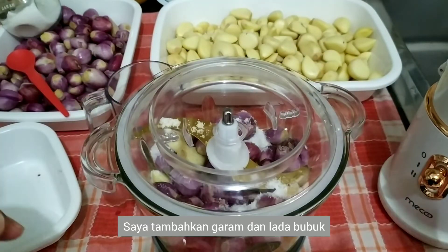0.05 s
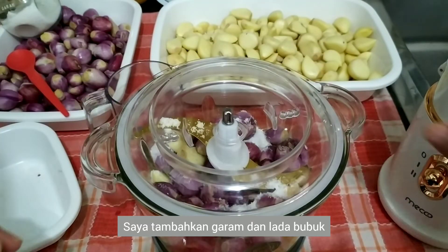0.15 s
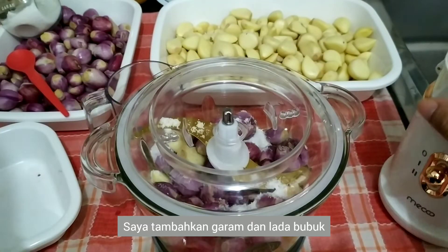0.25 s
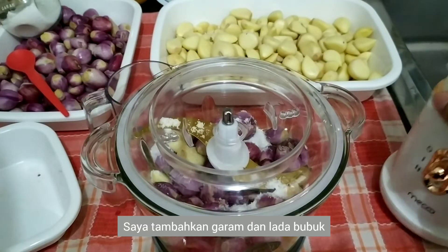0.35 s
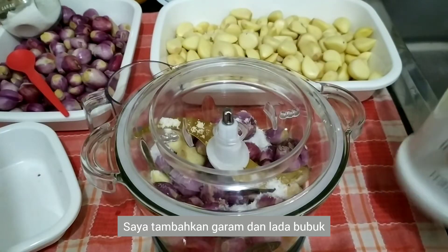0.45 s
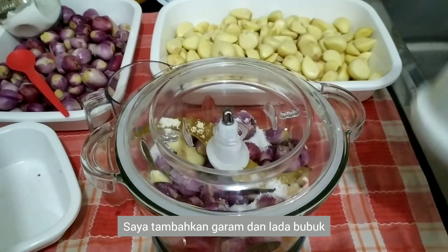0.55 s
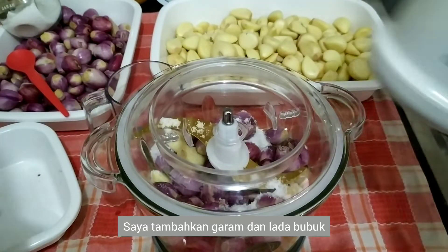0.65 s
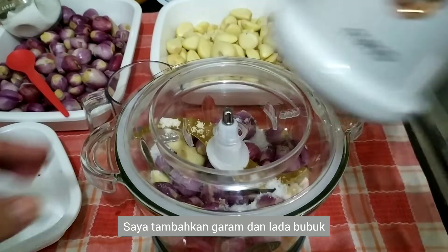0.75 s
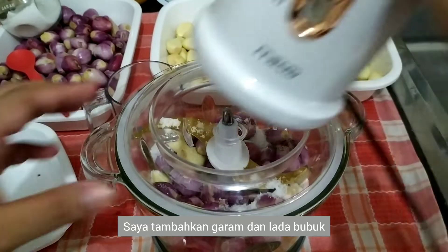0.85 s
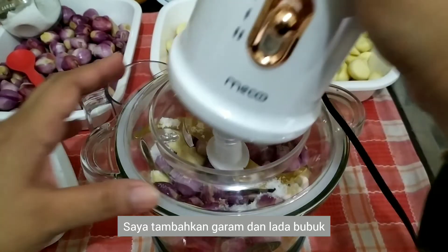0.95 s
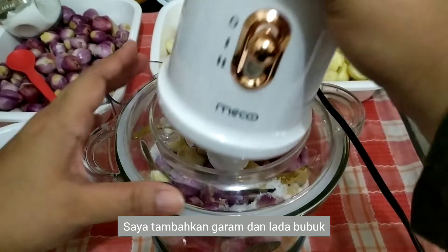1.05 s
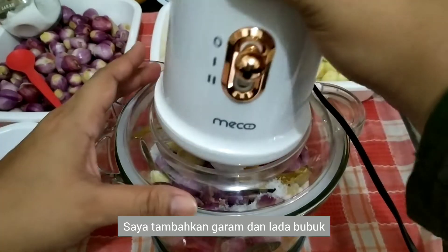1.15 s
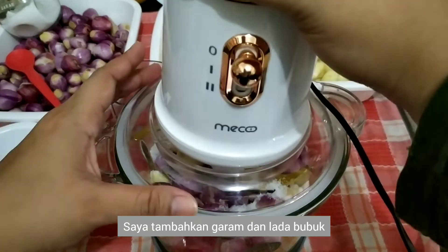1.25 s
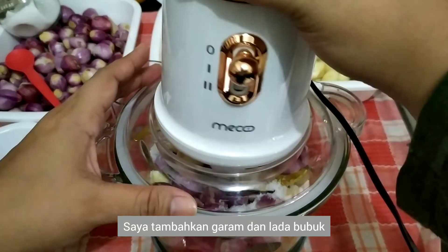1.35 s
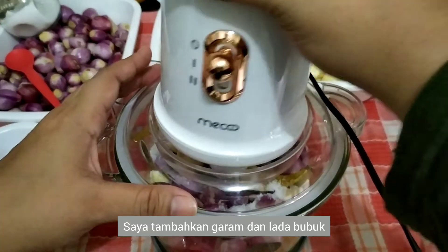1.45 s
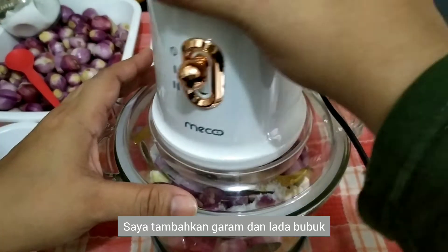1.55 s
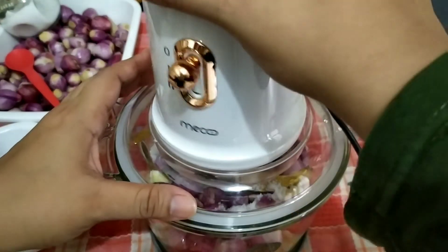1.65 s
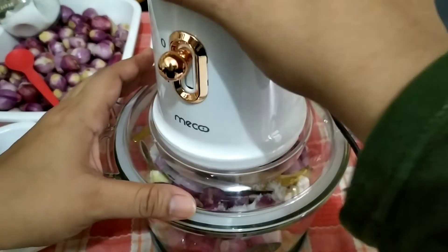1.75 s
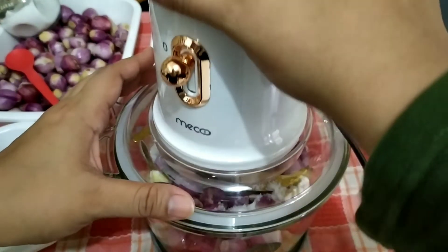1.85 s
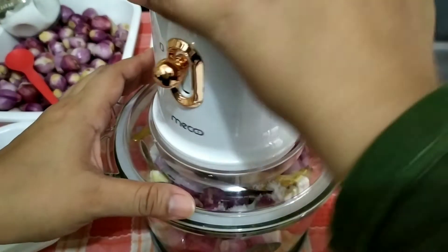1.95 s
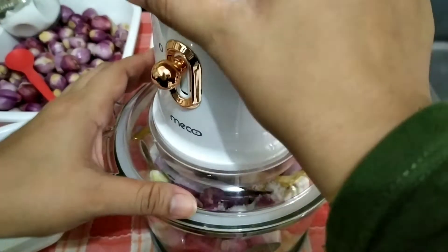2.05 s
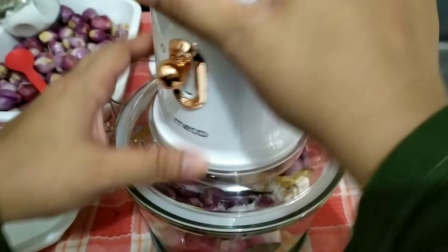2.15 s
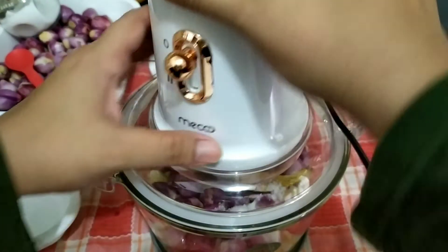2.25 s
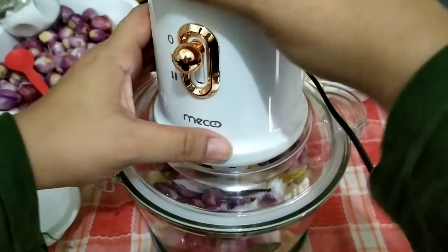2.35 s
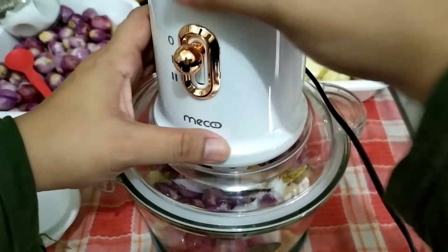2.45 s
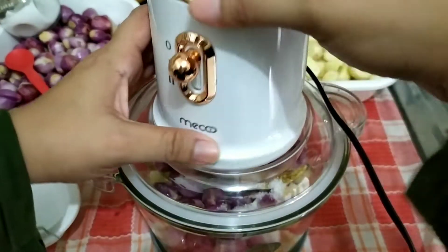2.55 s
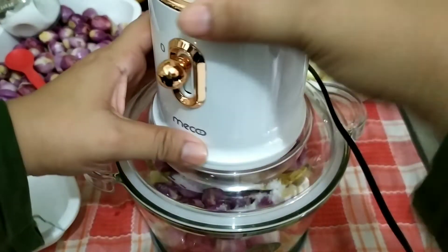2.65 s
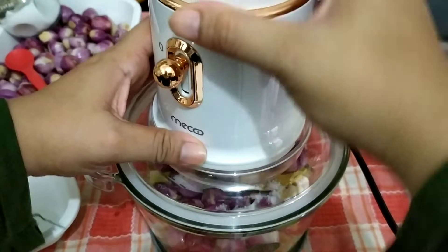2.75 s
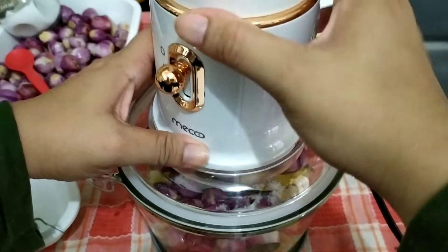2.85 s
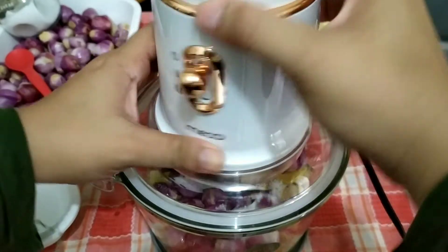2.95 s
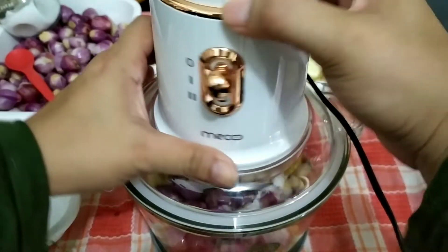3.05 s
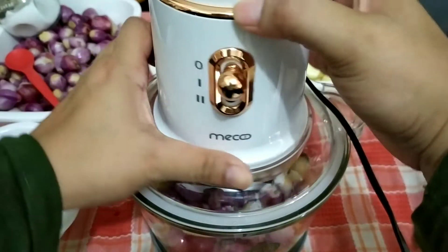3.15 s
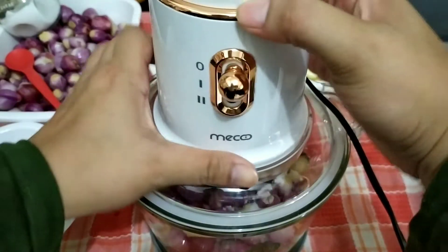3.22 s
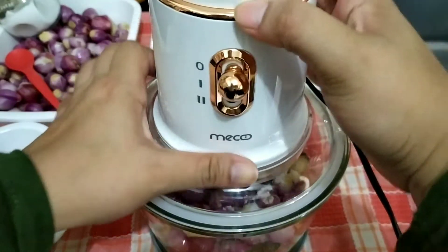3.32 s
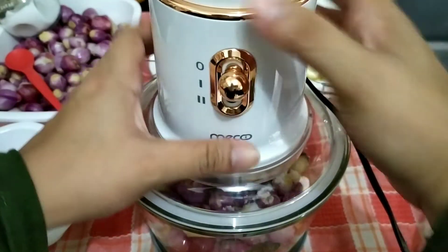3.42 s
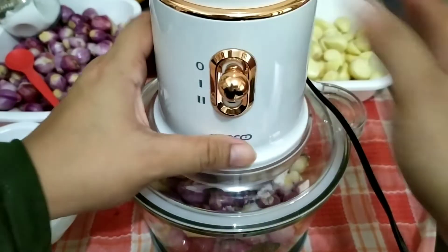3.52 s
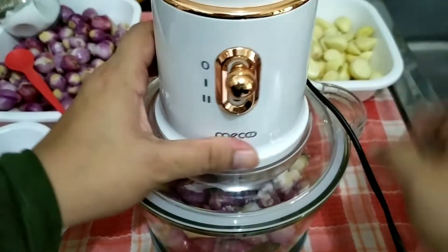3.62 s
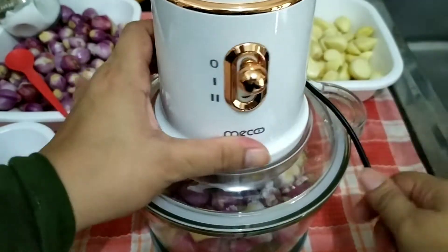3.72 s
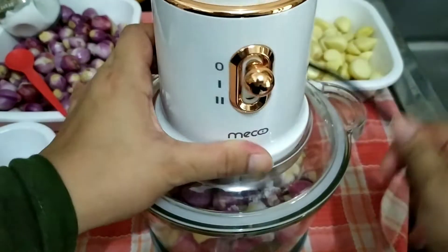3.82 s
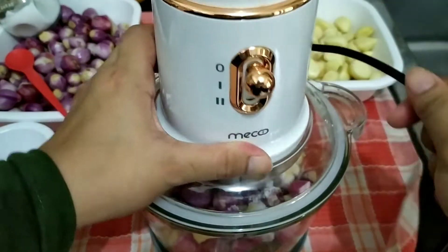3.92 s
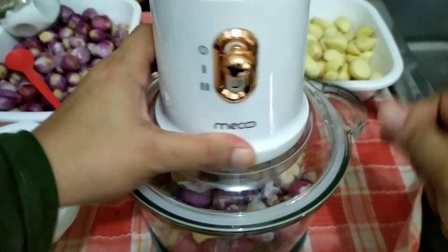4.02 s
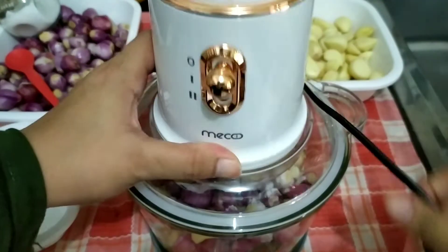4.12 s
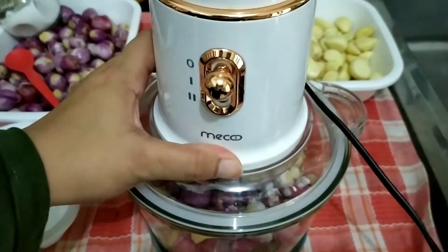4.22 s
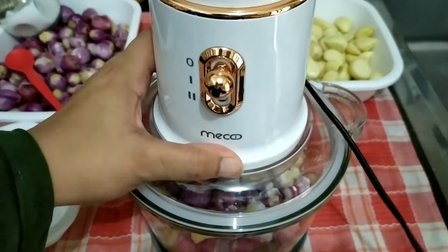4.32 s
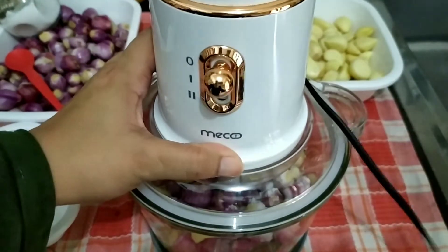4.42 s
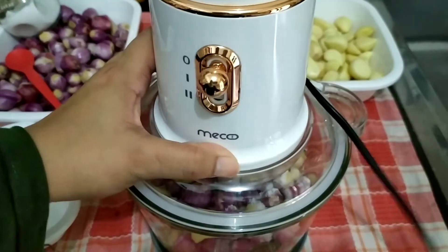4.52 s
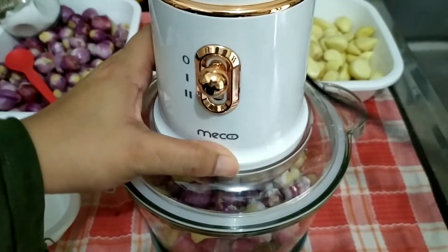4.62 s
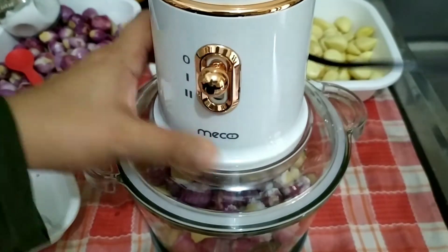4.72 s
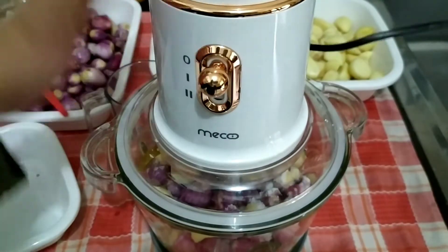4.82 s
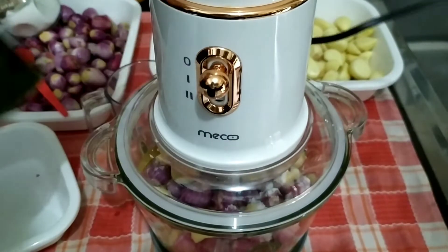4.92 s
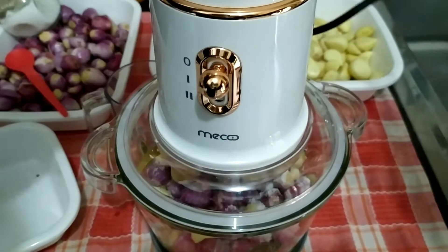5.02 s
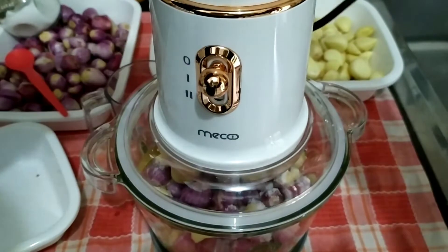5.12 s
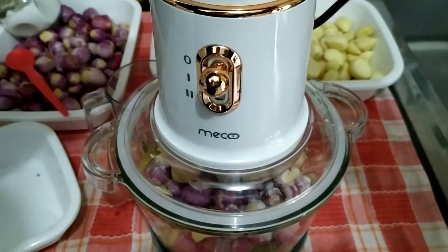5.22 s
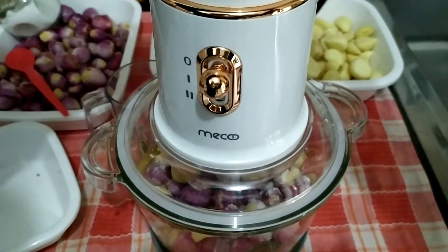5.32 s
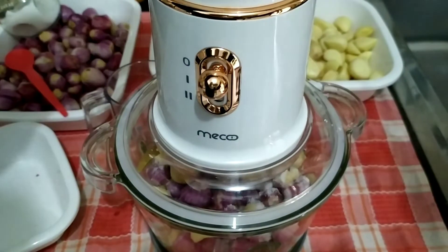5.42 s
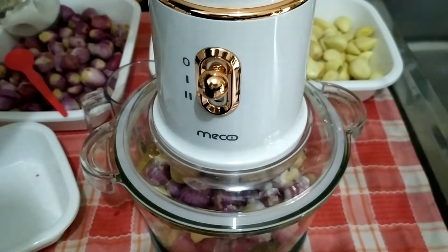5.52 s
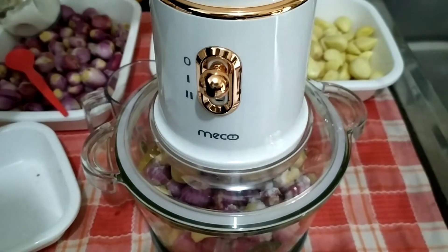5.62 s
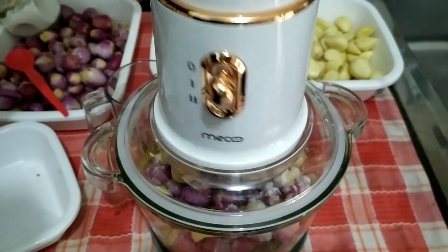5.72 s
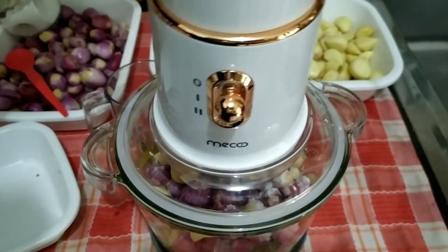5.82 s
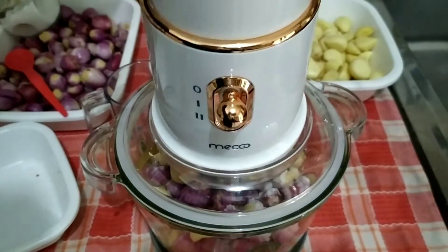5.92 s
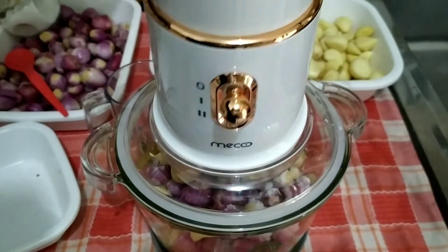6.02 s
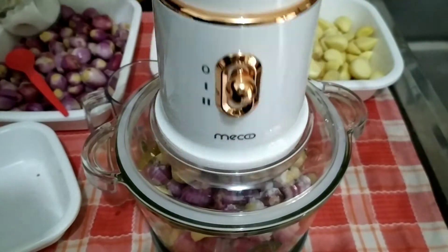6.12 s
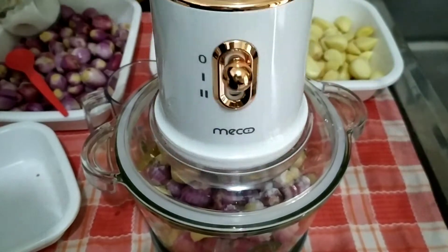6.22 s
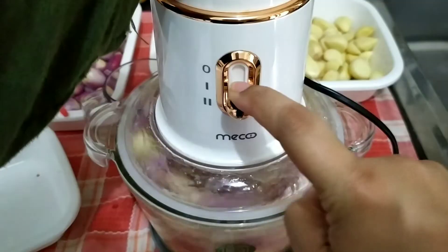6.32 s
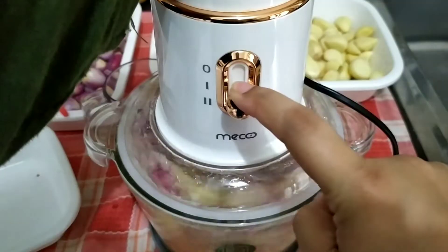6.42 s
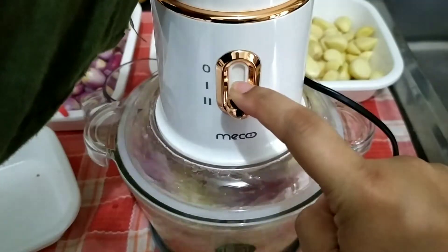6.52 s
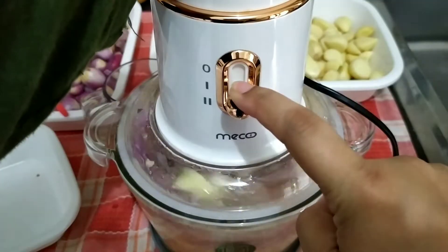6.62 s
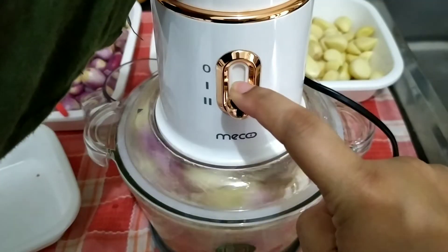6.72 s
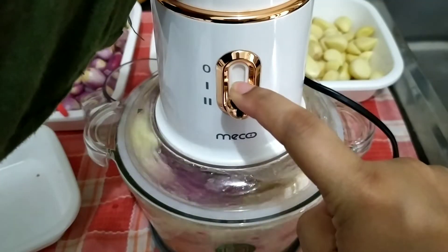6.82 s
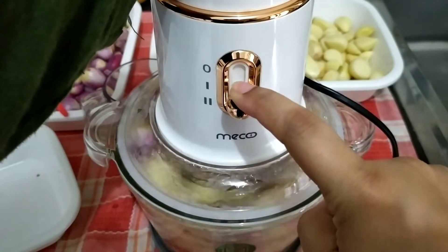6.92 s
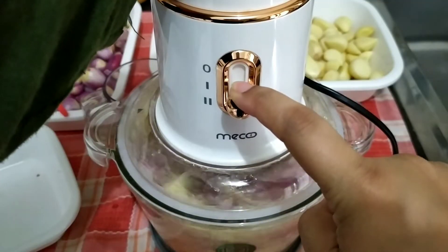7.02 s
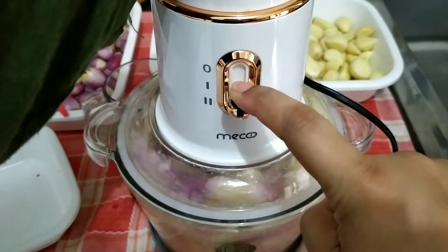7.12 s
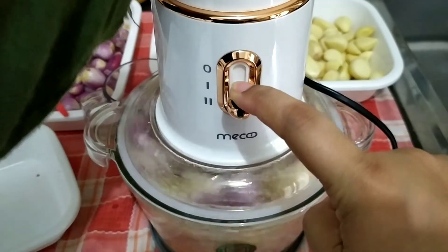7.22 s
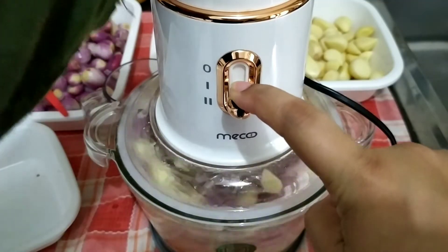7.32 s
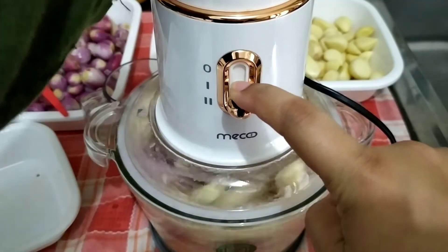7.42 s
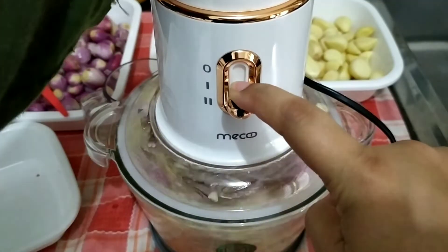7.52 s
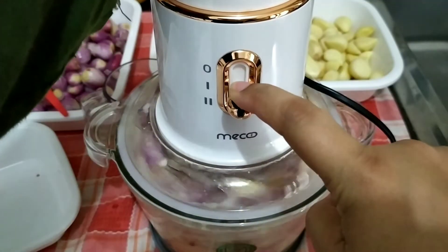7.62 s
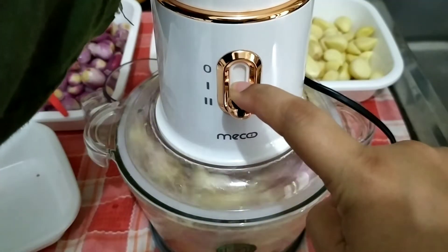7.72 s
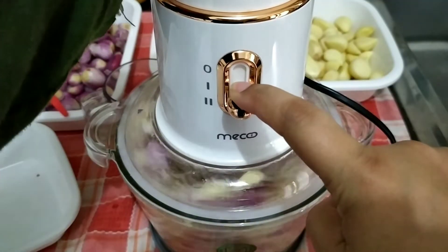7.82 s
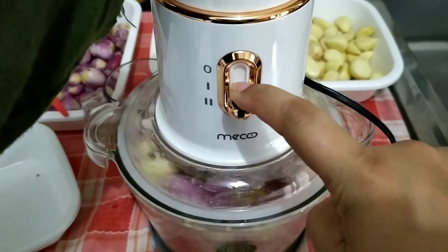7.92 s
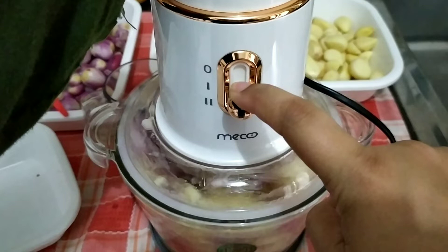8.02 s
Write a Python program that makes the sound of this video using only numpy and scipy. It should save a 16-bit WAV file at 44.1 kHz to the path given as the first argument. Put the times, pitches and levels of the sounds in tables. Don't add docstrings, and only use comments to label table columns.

```python
import sys
import numpy as np
from scipy import signal
from scipy.fft import rfft, irfft
from scipy.io import wavfile
from scipy.ndimage import uniform_filter1d

SR = 44100
rng = np.random.default_rng(int(sys.argv[2]) if len(sys.argv) > 2 else 0)


def unload_audio(sound):
    columns = np.transpose(np.atleast_2d(sound))
    steps = np.round(np.clip(columns, -1, 1) * 32767)
    wavfile.write(sys.argv[1], SR, steps.astype(np.int16))


def gain_from_db(level_db):
    decades = np.asarray(level_db, float) / 20
    return 10 ** decades


N = 355446

# f/Hz, level/dB per Hz
AIR = [(25, -26.5), (45, -4), (70, -12), (100, -5), (130, -17), (350, -19), (700, -19.5), (1100, -24),
       (3000, -26.5), (5500, -30), (6800, -38), (8200, -51), (9700, -58.5)]
# f/Hz, level/dB rms
HUM = [(102.3, -69), (150.7, -87.5), (247.6, -79), (349.9, -81), (452.2, -80.5), (699.8, -81.5)]
# f/Hz, t60/s
ROOM_T60 = [(100, 0.29), (400, 0.24), (1500, 0.29), (4000, 0.24), (8000, 0.18)]
# f/Hz, likeness/0-1
ROOM_SAME = [(60, 1), (300, 0.83), (700, 0.94), (1500, 0.95), (8000, 0.094)]
# f/Hz, likeness/0-1
NOISE_SAME = [(30, .85), (90, .94), (180, .93), (350, .82), (700, .64), (1400, .5), (2800, .28), (9000, .3)]
# f/Hz, level/dB
LEAN = [(60, 0), (210, -1.5), (740, -0.5), (2630, -0.5), (9250, 0.5)]

# start t/s, firmest t/s, end t/s, rub level/dB, rustle level/dB
SLIDES = [(0., 0.35, 0.6, -62.5, -67.5), (1.482, 1.636, 1.9, -56.5, -65), (1.93, 1.987, 2.22, -60, -70),
          (2.22, 2.343, 2.49, -50, -64), (2.413, 2.646, 2.73, -56, -64.5), (2.91, 2.984, 3.25, -55, -65),
          (3., 3.2, 4.1, -78, -100), (3.567, 3.69, 3.73, -65.5, -72), (4.008, 4.16, 4.23, -48, -59),
          (4.48, 4.543, 4.6, -64, -76), (5.36, 5.554, 5.94, -67, -63), (5.75, 5.91, 5.96, -51.5, -64)]
# f/Hz, level/dB per Hz
RUB = [(70, -31), (110, -3), (230, 0), (400, -6), (800, -11.5), (1400, -12), (2500, -18.5), (5000, -53.5)]
# f/Hz, level/dB per Hz
RUSTLE = [(900, -22), (1500, -8), (2500, -2), (4000, -1), (6000, 0), (7300, -6), (8500, -22), (9700, -42)]
# t/s, f/Hz, level/dB
SQUEAKS = [
    [(2.07, 3800, -80), (2.1, 3830, -55), (2.15, 3950, -51), (2.195, 3880, -54), (2.23, 3700, -66)],
    [(2.26, 3200, -66), (2.3, 3100, -52), (2.34, 3050, -52), (2.37, 2900, -60), (2.4, 2790, -52),
     (2.47, 2750, -50), (2.49, 2620, -57), (2.53, 2630, -53), (2.57, 2600, -64)],
]

# t/s, lid peak level/dB, lid f/Hz, bowl level/dB, table level/dB
BLOWS = [(0.367, -47.5, 335, -58, -50), (1.1451, -22, 370, -30, -46), (1.158, -20, 344, -39, -44),
         (1.2, -57, 227, -43, -62), (1.473, -20.5, 350, -28, -61), (1.486, -22, 442, -27, -41),
         (1.613, -42, 466, -51, -47.5), (1.717, -38.5, 305.7, -59, -52), (1.754, -19, 380, -20.5, -50),
         (1.762, -31, 225, -25.5, -43), (2.334, -29, 368, -50, -36.5), (2.947, -21.5, 358, -37.5, -42),
         (2.96, -26, 273, -36.5, -38), (3.641, -49, 295, -75, -49.5), (4.02, -34.5, 385, -61, -43),
         (4.508, -60, 324, -64, -57), (5.786, -41, 294, -41, -49.5), (5.805, -30.5, 340, -36, -62),
         (5.825, -29, 241, -57, -57), (5.883, -26.5, 283, -39.5, -59), (5.899, -50, 259, -69, -45.5),
         (6.1311, -22, 340, -34.5, -29.5), (6.158, -26, 228, -54, -26.5)]
# t/s, lid peak level/dB, lid f/Hz
BUMPS = [(0.292, -65, 230), (.998, -37, 350), (1.644, -32.5, 306), (1.963, -35.5, 547), (2.195, -39, 320),
         (2.207, -30.5, 250), (2.22, -28.5, 435), (2.348, -23.5, 470), (2.49, -51, 258), (2.571, -30, 420),
         (2.641, -43, 339), (2.763, -60, 312), (3.069, -34.5, 432), (3.126, -51, 316), (3.323, -60, 304),
         (4.135, -44, 233), (4.164, -43, 333)]
# multiple of lid pitch/1, level/dB
LID_MODES = [(1.003, -10), (1.45, 2.5), (2.049, -5.5)]
# t/s, f/Hz, level/dB
CLINKS = [(.998, 1530, -51), (1.045, 1500, -61), (1.147, 4580, -50), (1.158, 2250, -46), (1.165, 1330, -53),
          (1.165, 1520, -54), (1.16, 511, -42), (2.573, 1520, -61), (2.57, 5250, -59), (2.572, 540, -48),
          (6.162, 673, -44), (6.162, 565, -47), (6.137, 1330, -48), (6.137, 2230, -50), (6.16, 2200, -54)]

# t/s, crack peak level/dB, brightness above 4.5 kHz/dB,
# housing level/dB, housing f/Hz
KNOCKS = [(.3654, -24.5, -16.5, -46, 1680), (.3772, -28.5, -1, -43, 1710), (.9977, -32.5, -18, -44, 1505),
          (1.1458, -27, -17.5, -37, 1560), (1.1505, -24, -18, -37, 1380), (1.1595, -21, -15.5, -21.5, 1360),
          (1.163, -43, -11, -28.5, 1335), (1.4751, -25.5, -11, -33.5, 1590),
          (1.4873, -20.5, -11.5, -29, 1235), (1.6437, -31, -13, -48, 1220), (1.717, -28, -12, -46.5, 1190),
          (1.7547, -26.5, -14, -35, 1560), (1.7642, -20.5, -19.5, -38.5, 1440),
          (2.2221, -23, -16.5, -41.5, 1560), (2.3509, -21.5, -14.5, -35, 1504),
          (2.573, -33.5, -19, -44.5, 1610), (2.9507, -21, -19.5, -30, 1560), (2.962, -21, -16, -36, 1618),
          (3.0675, -34, -18, -42.5, 1410), (3.1281, -35.5, -19.5, -48.5, 1590),
          (3.6414, -37.5, -13.5, -50.5, 1274), (4.0179, -26.5, -22, -53, 1170),
          (4.0746, -48, -16, -46.5, 1260), (4.136, -32.5, -24.5, -52, 1250)]
# t/s, crack peak level/dB, brightness above 4.5 kHz/dB
CLICKS = [(0.2753, -42, -11), (0.4211, -29, -14.5), (0.461, -43, -5), (0.6848, -43.5, -12),
          (1.2065, -38, -15), (1.3175, -45, -10), (1.5966, -37, -4), (1.8603, -39.5, -10),
          (1.922, -41.5, -16.5), (1.961, -32, -18), (2.0456, -42.5, -19), (2.2446, -32, -19),
          (2.4922, -36.5, -12.5), (2.7281, -40.5, -15.5), (2.7665, -38.5, -19), (3.324, -39, -15),
          (3.4363, -41.5, -12.5), (3.5434, -40.5, -14.5), (4.1652, -36, -18), (4.205, -39.5, -15),
          (4.512, -38, -16.5), (4.5688, -44, -19), (5.8041, -25.5, -10), (5.8859, -30, -16.5),
          (6.1319, -19.5, -15), (6.1615, -31, -21), (6.2092, -36, -21), (6.2765, -24, -17),
          (6.2936, -38, -13), (6.4298, -19, -15)]
# t/s, peak level/dB, f/Hz
PINGS = [(0.276, -51, 1990), (0.364, -39, 2920), (0.421, -27, 2450), (0.4607, -48, 4220),
         (0.6837, -52, 1980), (0.997, -40, 1870), (1.0429, -57, 1980), (1.144, -33, 2240),
         (1.1569, -24, 2240), (1.3173, -53, 4730), (1.4734, -33, 2170), (1.4862, -22, 4540),
         (1.595, -51, 3670), (1.6431, -36, 2240), (1.7159, -34, 3560), (1.7543, -27, 3630),
         (1.7625, -24, 4240), (1.8604, -42, 5200), (1.921, -43, 5230), (1.9607, -40, 2500),
         (2.045, -44, 2660), (2.143, -46, 4050), (2.22, -37, 2460), (2.3506, -24, 4320),
         (2.4905, -34, 2600), (2.57, -37, 2540), (2.7276, -50, 2330), (2.765, -44, 2470),
         (2.9318, -46, 1980), (2.9492, -27, 2880), (2.9626, -26, 2300), (3.067, -44, 2120),
         (3.1273, -41, 4060), (3.3232, -47, 2200), (3.436, -56, 4230), (3.5436, -34.5, 4360),
         (3.641, -44, 5170), (4.017, -44, 1900), (4.1124, -51, 2050), (4.1329, -44, 2130),
         (4.1633, -44, 5250), (4.2032, -43, 4110), (4.511, -54, 2520), (4.568, -53, 2310),
         (5.8047, -31, 2610), (5.8854, -34, 3140), (6.13, -37, 3240), (6.2083, -34, 3770),
         (6.2763, -22, 2200)]
# f/Hz, level/dB per Hz
CRACK = [(300, -4), (1000, -15), (2500, -3.5), (4500, 0.5), (6300, -1), (7500, -14.5), (8800, -23.5),
         (9800, -32)]
# multiple of housing pitch/1, level/dB
HOUSING_MODES = [(1, 7), (1.17, -2.5), (.83, -18.5)]

# t/s, level/dB
LOAD = [(6.282, -44.5), (6.294, -37.5), (6.43, -38), (6.47, -36.5), (6.77, -36), (6.93, -37.5), (7.2, -39),
        (7.79, -40), (7.85, -41.5), (8.07, -42)]
# t/s, f/Hz (turns a second)
SHAFT = [
    (6.27, 126),
    (6.45, 121),
    (6.8, 121),
    (7.0, 123),
    (7.75, 123),
    (8.07, 113),
]
# multiple of shaft speed/1, level/dB rms
SHAFT_TONES = [(1, -46), (2, -52)]
# f/Hz, level/dB per Hz
MOTOR = [(530, -6), (900, -6), (1290, -10.5), (1590, -4), (1860, -12.5), (2160, -5), (2660, -5),
         (3850, -12), (5730, -12.5), (6990, -19), (9700, -43), (12600, -66), (21300, -120)]
# f/Hz, level/dB per Hz
CHURN = [(25, -40.5), (45, -19), (62, -14), (88, 6.5), (125, 2.5), (214, 0), (260, 1), (400, -8),
         (650, -7.5), (900, -47)]
# f/Hz, width/Hz, level/dB
BOWL_MODES = [(500, 550, 8.5), (692, 37, -2.5), (760, 99, 5), (1040, 240, -2), (1590, 110, -4),
              (2230, 350, -9), (2660, 570, -12), (3270, 180, -1.5)]
# t/s, level/dB
SURGES = [(6.31, 7.7), (6.47, 4.9), (6.525, 3.9), (6.93, 5.4), (7.16, 5.6), (7.69, 4.8), (8.03, 6.4)]
# t/s, peak level/dB, f/Hz
TAPS = [(6.285, -29, 689), (6.335, -22, 755), (6.372, -28.5, 700), (6.403, -29, 690), (6.427, -33, 630),
        (6.458, -24, 673), (6.508, -27, 660), (6.537, -23, 660), (6.565, -31, 720), (6.589, -30.5, 988),
        (6.608, -30, 646), (6.632, -25.5, 735), (6.726, -27, 467), (6.808, -31, 452), (6.818, -28, 923),
        (6.863, -27, 696), (6.915, -24.5, 747), (6.946, -22, 762), (6.977, -29, 675), (7.021, -34, 720),
        (7.06, -31, 506), (7.103, -27, 830), (7.145, -23, 724), (7.217, -30, 690), (7.267, -34, 725),
        (7.289, -37, 610), (7.32, -39, 818), (7.369, -27, 686), (7.425, -26, 760), (7.446, -29, 795),
        (7.458, -25, 690), (7.494, -27.5, 670), (7.529, -35, 778), (7.598, -25, 705), (7.612, -24, 905),
        (7.643, -33, 700), (7.67, -28, 641), (7.694, -29, 783), (7.702, -26, 807), (7.752, -26, 738),
        (7.774, -28, 692), (7.794, -33, 710), (7.86, -36, 805), (7.995, -27, 814)]
# t/s, peak level/dB, f/Hz
CHIPS = [(6.2928, -19, 2120), (6.337, -26, 1600), (6.4304, -16.5, 2680), (6.456, -25, 1600),
         (6.4899, -29, 1600), (6.6071, -22, 1590), (6.703, -24, 1540), (6.8351, -31, 1420),
         (6.8635, -26, 1580), (6.9738, -18, 1650), (7.0302, -28, 1540), (7.0791, -33, 2710),
         (7.172, -20, 2580), (7.267, -33, 2430), (7.4233, -30, 2240), (7.4529, -21, 1570),
         (7.4932, -24, 1510), (7.581, -23, 1580), (7.6702, -18, 2260), (7.7277, -30, 2800),
         (7.75, -27, 2680), (7.772, -16, 2760), (7.8753, -28, 2320), (7.997, -34, 2940),
         (8.0209, -18, 2220)]
# t/s, peak level/dB, f/Hz, snap level/dB
SLAPS = [(6.402, -24.5, 160, -39.5), (6.498, -23, 178, -38.5), (6.68, -17.5, 196, -39),
         (7.565, -20, 240, -38), (6.608, -23, 242, -32), (6.833, -14, 180, -41), (6.865, -27, 175, -27),
         (6.976, -24, 189, -26.5), (7.171, -24, 231, -37), (7.424, -17, 189, -47), (7.493, -21, 180, -23),
         (7.618, -18.5, 198, -37), (7.795, -14.5, 197, -31)]

START_S = LOAD[0][0]


def evened(x):
    return x / np.sqrt(np.mean(x ** 2) + 1e-20)


def wander(size):
    drift = uniform_filter1d(rng.standard_normal(N), size=size)
    return evened(uniform_filter1d(drift, size=size))


def read(points, hz):
    f, value = np.transpose(points)
    return np.interp(np.log(hz + 1), np.log(f + 1), value)


def play(rows, column):
    rows = np.array(rows)
    return np.interp(np.arange(N) / SR, rows[:, 0], rows[:, column], left=-150, right=-150)


def add(mix, s, sound):
    part = mix[..., round(s * SR):][..., :sound.shape[-1]]
    part += sound[..., :part.shape[-1]]


def resonate(x, hz, width):
    turn = np.exp(2j * np.pi * np.cumsum(hz * np.ones(N)) / SR)
    r = np.exp(-np.pi * width / SR)
    return 2 * (turn * signal.lfilter([1 - r], [1, -r], x / turn)).real


def ring(hz, t60, rise, size=6000):
    t = np.arange(size) / SR
    return gain_from_db(-60 * t / max(t60, .004)) * (1 - np.exp(-t / rise)) * np.sin(2 * np.pi * hz * t)


def ports(sound, lag_s):
    lag = round(abs(lag_s) * SR)
    pair = np.array([np.pad(sound, (0, lag)), np.pad(sound, (lag, 0))])
    return pair[::1 if lag_s > 0 else -1]


def notes(rows, gain_db, t60, rise):
    out = np.zeros((2, N))
    lags_s = rng.uniform(-1, 1, len(rows)) * .0002
    for (s, db, hz), lag_s in zip(rows, lags_s):
        note = ring(hz, t60, rise, size=3000)
        add(out, s - .001, ports(gain_from_db(db + gain_db) * note / abs(note).max(), lag_s))
    return out


def noise(colour, patchy_db, flicker_db, size=512):
    frames, hz = N // (size // 4) + 5, np.fft.rfftfreq(size, 1 / SR)
    a, b, c, d, patches = rng.standard_normal((frames, len(hz), 5)).T
    patches = uniform_filter1d(patches, size=5, axis=0)
    patches = evened(uniform_filter1d(patches, size=12, axis=1))
    flicker = evened(uniform_filter1d(rng.standard_normal(frames), size=4))
    same = np.clip(read(NOISE_SAME, hz), -1, 1)[:, None]
    left = a + 1j * b
    z = np.array([left, same * left + np.sqrt(1 - same ** 2) * (c + 1j * d)])
    z *= gain_from_db(read(colour, hz)[:, None] + patchy_db * patches + flicker_db * flicker)
    return evened(signal.istft(z, nperseg=size, noverlap=size * 3 // 4)[1][:, :N])


def kitchen():
    t, sway = np.arange(N) / SR, np.cumsum(wander(size=2000)) / SR
    hum = np.zeros(N)
    for hz, db in HUM:
        tone = np.sqrt(2) * np.sin(2 * np.pi * hz * (t + 0.01292 * sway))
        hum += gain_from_db(db + 2.5 * wander(size=3000)) * tone
    return gain_from_db(-64) * noise(AIR, 0.33, 0.25, size=2048) + hum


def room(x):
    taps = np.zeros((2, SR // 2))
    grid = np.arange(130, SR // 2 - 22, 22)
    at = grid + rng.integers(0, 22, (2, len(grid)))
    np.put_along_axis(taps, at, rng.choice([-1., 1.], at.shape), 1)
    hz, t, (a, b) = signal.stft(taps, SR, nperseg=256)
    same = np.clip(read(ROOM_SAME, hz), 0, 1)[:, None]
    z = np.array([a, same * a + np.sqrt(1 - same ** 2) * b])
    tail = signal.istft(z * gain_from_db(-60 * t / read(ROOM_T60, hz)[:, None]), SR, nperseg=256)[1]
    walls_s = 0.0055
    tail = tail * (1 - np.exp(-(np.arange(tail.shape[1]) / SR / walls_s) ** 2))
    return signal.fftconvolve(x[None], tail / np.linalg.norm(tail[0]), axes=1)[:, :N]


def squeaks():
    out = np.zeros(N)
    for rows in SQUEAKS:
        hz = np.maximum(play(rows, 1), 100)
        fuzz = resonate(rng.standard_normal(N), hz, 420.)
        fuzz = resonate(fuzz, hz, 420.)
        out += evened(fuzz) * gain_from_db(play(rows, 2) - 6.5 + 2.6 * wander(size=200))
    return out


def sliding():
    ends_db = -14
    rub, rustle = np.zeros((2, N))
    for start, firm, end, rub_db, rustle_db in SLIDES:
        t = np.arange(start, end, 1 / SR)
        press = gain_from_db(np.interp(t, [start, firm, end], [ends_db, 0, ends_db]))
        add(rub, start, gain_from_db(rub_db) * press)
        add(rustle, start, gain_from_db(rustle_db) * press)
    rub, rustle = uniform_filter1d([rub, rustle], size=1200)
    return rub * noise(RUB, 2.5, 2.5) + rustle * noise(RUSTLE, .6, .8)


def clinks():
    out = np.zeros(N)
    for s, hz, db in CLINKS:
        rattle = evened(uniform_filter1d(rng.standard_normal(6000), size=150))
        add(out, s, gain_from_db(db) * ring(hz, .22, .001) * (.8 + .6 * rattle))
    return out


def thuds():
    out = clinks()
    firm = [(*row, 0.022) for row in BLOWS]
    held = [(s, db, hz, db - 19, db - 24, 0.015) for s, db, hz in BUMPS]
    for s, db, hz, bowl_db, boom_db, t60 in firm + held:
        lid = ring(hz, 0.016, 0.002)
        for k, mode_db in LID_MODES:
            lid += .5 * gain_from_db(mode_db) * ring(hz * k, t60 / np.sqrt(k), 0.0071)
        add(out, s, gain_from_db(db - 0.5) * lid / abs(lid).max())
        add(out, s, gain_from_db(bowl_db + 4.5) * ring(192.1, 0.13, 0.0049))
        add(out, s, gain_from_db(boom_db - 1.0) * ring(97.3, 0.37, 0.0053, size=9000))
    return signal.sosfilt(signal.butter(2, 75., "high", fs=SR, output="sos"), out)


def contacts():
    cracks = notes(PINGS, gain_db=-6, t60=.0055, rise=0.00057)
    housings, snaps = np.zeros((2, N)), np.zeros(N)
    t, hz = np.arange(1024) / SR, np.fft.rfftfreq(1024, 1 / SR)
    clicks = [(s, db, bright_db, db - 24, 1416) for s, db, bright_db in CLICKS]
    for s, db, bright_db, housing_db, housing_hz in KNOCKS + clicks:
        z = rng.standard_normal((3, 1024))
        crunch_ms = gain_from_db(0.22 * (db + 46.5))
        crunch = (z[0] + .5 * z[1:]) * np.exp(-1000 * t / crunch_ms)
        tilt_db = (bright_db + 9.5) * np.log2((hz + 500) / 3500.)
        colour = gain_from_db(read(CRACK, hz) + tilt_db) * hz ** 2 / (hz ** 2 + 220. ** 2)
        burst = np.roll(crunch + 8.5 * (t == 0), 88, axis=1)
        crack = irfft(rfft(burst) * colour)
        crack *= gain_from_db(db + 1.0) / abs(crack).max()
        add(cracks, s - .002, crack)
        snap = np.roll(irfft(colour), 88)
        add(snaps, s - .002, snap * np.linalg.norm(crack[0]) / np.linalg.norm(snap))
        housing = sum(gain_from_db(d) * ring(housing_hz * k, 0.016, 0.0019, size=1200) for k, d in HOUSING_MODES)
        housing *= gain_from_db(housing_db + 2.0) / abs(housing).max()
        add(housings, s - .001, ports(housing, .00009 * z[0, 0]))
    return cracks, housings, snaps


def flung_pieces(throb):
    strength = gain_from_db(2.7 * np.minimum(rng.exponential(1, N), 3.2))
    hits = rng.random(N) < 2000. * throb / SR
    pieces = strength * hits * gain_from_db(1.3 * wander(size=400))
    spot = rng.integers(0, 2 * len(BOWL_MODES), N)
    taps, start = np.zeros((2, N)), round(START_S * SR)
    for k, (hz, width, db) in enumerate(BOWL_MODES + BOWL_MODES):
        mode = gain_from_db(db) * np.sqrt(width) * ring(hz, 2.03 / width, 0.0007, size=1000)
        side = taps[k // len(BOWL_MODES)]
        add(side, START_S, signal.oaconvolve((pieces * (spot == k))[start:], mode))
    taps = evened((taps + 0.27 * taps[::-1])[:, start:])
    return np.pad(taps, ((0, 0), (start, 0)))


def motor_hiss(throb, since):
    hiss = noise(MOTOR, 0.98, 0.23) * throb * gain_from_db(.8 * wander(size=50))
    hum = evened(resonate(noise(MOTOR, 0, 0), 1585. + 28 * wander(size=2500), 100.))
    hiss += gain_from_db(-15.5 + 4 * wander(size=800)) * hum
    spin_up = np.clip(0.38 + since / 0.011, 0, 1) * (since > 0)
    return hiss * spin_up * gain_from_db(-34 + 0.37 * (play(SHAFT, 1) - 122.0))


def chip_flares(motor):
    out = np.zeros((2, N))
    for s, db, hz in CHIPS:
        flare = gain_from_db(db + 23.0) * ring(60, .02, .0005, size=360)
        add(out, s - .001, flare * motor[:, round(s * SR):][:, :360])
    return out


def slaps():
    out = np.zeros((2, N))
    snap = sum(ring(f, 0.021, 0.00018, size=500) for f, width, d in BOWL_MODES[4:]) / 2
    for s, db, hz, snap_db in SLAPS:
        add(out, s, gain_from_db(db + 1) * ring(hz, .022, .0015)[None])
        add(out, s, gain_from_db(snap_db + 1.5) * snap[None])
    return out


def chopper():
    shaft_hz = np.maximum(play(SHAFT, 1), 1) * (1 + .008 * wander(size=1500))
    angle = 2 * np.pi * np.cumsum(shaft_hz) / SR
    throb = 1 + 0.13 * np.cos(angle)
    t, load_db = np.arange(N) / SR, play(LOAD, 1)
    since = t - START_S
    chop_db = load_db - 4.5 - 0.5 * since
    chop_db += sum(db * np.exp(-.5 * ((t - s) / 0.057) ** 2) for s, db in SURGES)
    motor = motor_hiss(throb, since)
    tones = sum(gain_from_db(db) * np.sqrt(2) * np.sin(k * angle) for k, db in SHAFT_TONES)
    out = gain_from_db(load_db + 1.5) * noise(CHURN, 1.4, 0.35, size=1024)
    out += gain_from_db(chop_db) * flung_pieces(throb) + motor + tones * gain_from_db(load_db + 39.5)
    out *= gain_from_db(.9 * wander(size=350))
    out += notes(TAPS, gain_db=-5.5, t60=0.054, rise=0.0011)
    out += notes(CHIPS, gain_db=-7, t60=.013, rise=0.00025)
    out += chip_flares(motor) + slaps()
    return signal.sosfilt(signal.butter(3, 60., "high", fs=SR, output="sos"), out)


def scene():
    background = kitchen() + sliding() + squeaks()
    heavy = thuds()
    cracks, housings, snaps = contacts()
    machine = chopper()
    wet = gain_from_db(-4.5) * snaps + gain_from_db(-16.5) * housings[0] + gain_from_db(-9.0) * heavy + gain_from_db(-14.0) * machine.mean(0)
    near = cracks + housings + ports(heavy, .00016)[:, :N]
    near = near * gain_from_db([[-.8], [.8]])
    return near + machine + room(wet) + background


def roll_off(x):
    return signal.sosfilt(signal.butter(12, 9850, fs=SR, output="sos"), x)


def record(dry):
    hz = np.fft.rfftfreq(N, 1 / SR)
    lean_db = read(LEAN, hz) / 2
    bass_cut = 1 / np.sqrt(1 + (58.4 / (hz + 1)) ** 4)
    treble_cut = (hz < 9850) * gain_from_db(-12. * np.clip(hz / 1000 - 9, 0, 1))
    mix = irfft(rfft(dry) * gain_from_db([lean_db, -lean_db]) * bass_cut * treble_cut, N) + 0.0014
    return roll_off(mix)


dry = scene()
out = record(dry)
unload_audio(out)
```